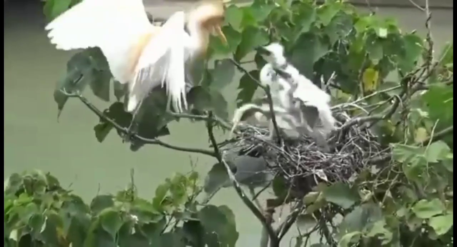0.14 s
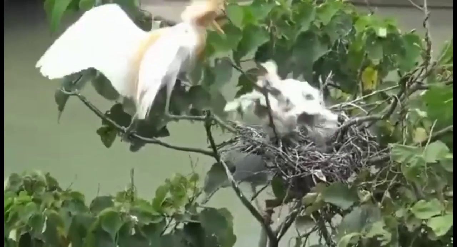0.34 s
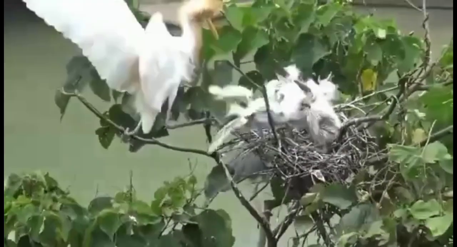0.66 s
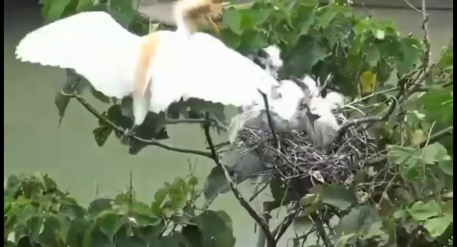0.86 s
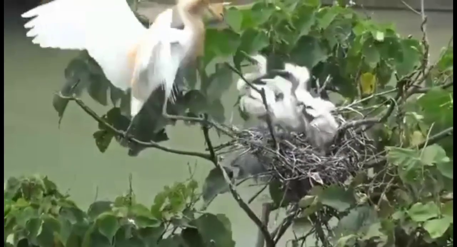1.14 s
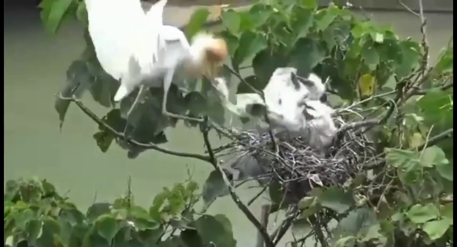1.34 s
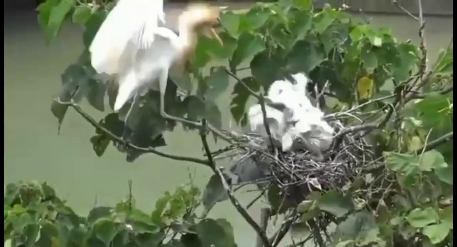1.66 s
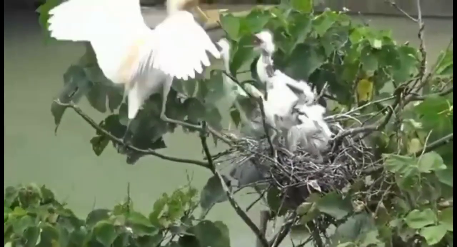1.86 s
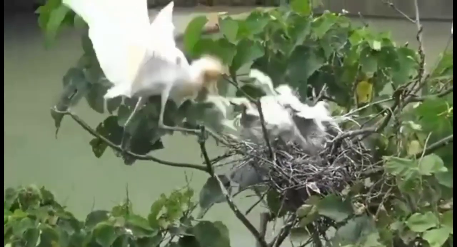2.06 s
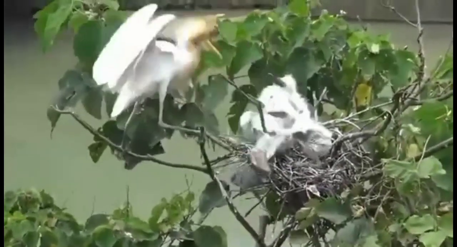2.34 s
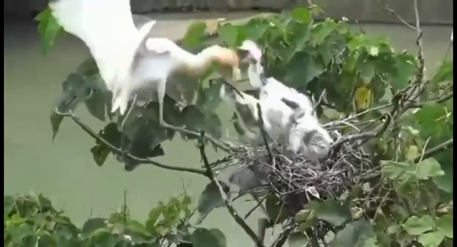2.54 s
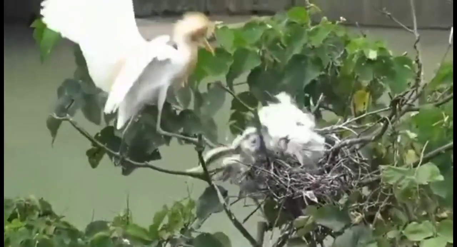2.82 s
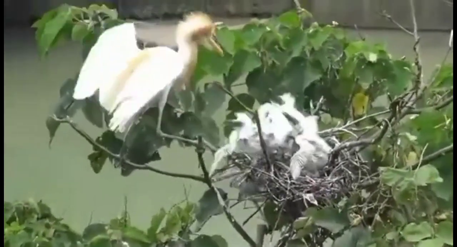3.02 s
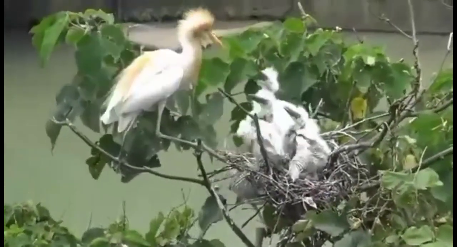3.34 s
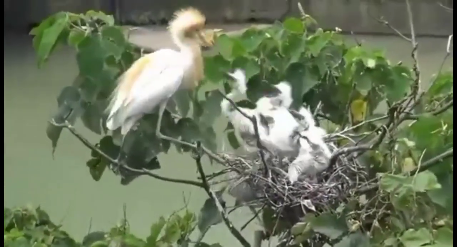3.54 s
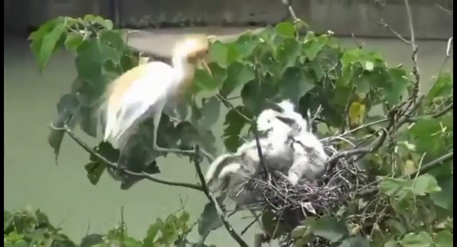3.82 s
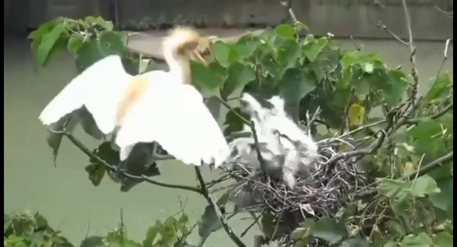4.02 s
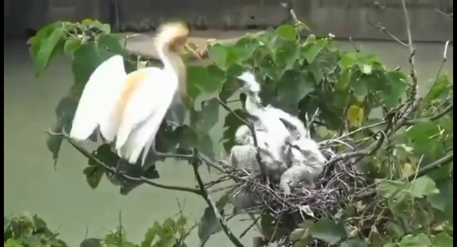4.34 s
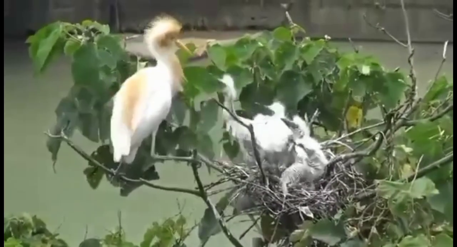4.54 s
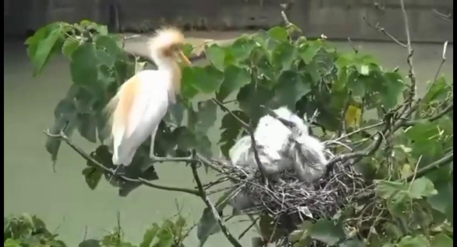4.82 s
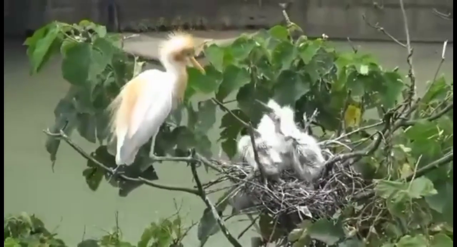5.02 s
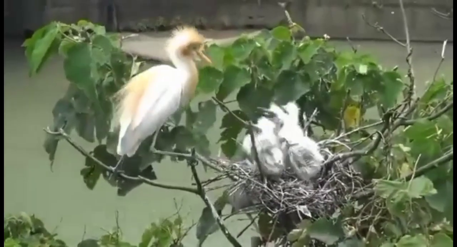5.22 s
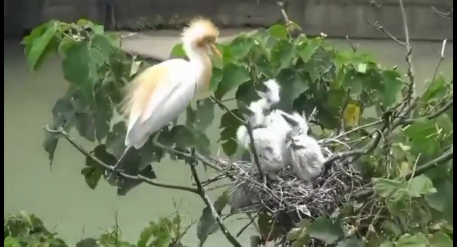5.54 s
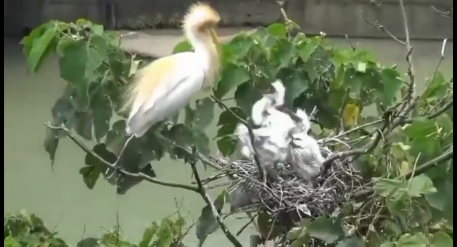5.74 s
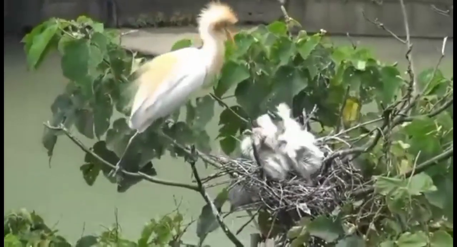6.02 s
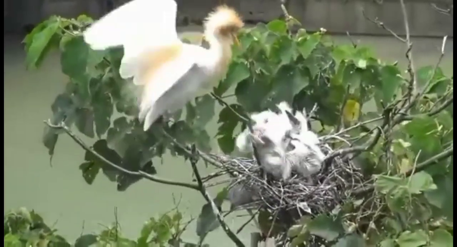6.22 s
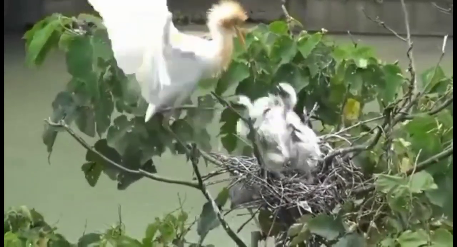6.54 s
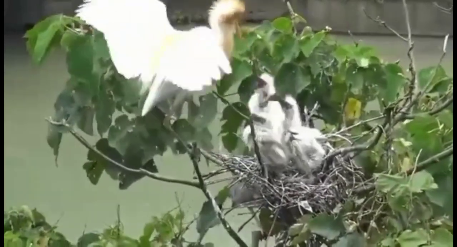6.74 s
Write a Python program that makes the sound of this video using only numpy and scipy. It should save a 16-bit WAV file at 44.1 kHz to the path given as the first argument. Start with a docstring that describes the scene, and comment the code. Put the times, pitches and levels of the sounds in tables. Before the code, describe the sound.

Several nestlings cheep frantically over one another, thin high whistled chirps sliding downward in an unbroken overlapping stream, close and outdoors.

```python
"""A brood of chicks begs from a nest in a leafy tree, over a quiet outdoor hush made of noise bands.
A loud falling peep opens the scene; more overlap in surges, mostly falling tones with two overtones.
Short low rasps of chopped noise slip in, with one dull knock near 2.9 s; fainter chicks peep behind.
The loudest peep comes about two and a half seconds in, and the begging goes on to the end.
Leaves and branches smear every call into a short haze of sparse, dying echoes."""
import sys
import numpy as np
from scipy import signal
from scipy.io import wavfile
from scipy.ndimage import uniform_filter1d

SR = 44100
rng = np.random.default_rng(int(sys.argv[2]) if len(sys.argv) > 2 else 0)


def master_out(mix):
    """Clip the mix to full scale and print it as 16-bit PCM to the path in sys.argv[1]."""
    frames = np.transpose(np.atleast_2d(mix))
    ceiling = np.clip(frames, -1, 1)
    pcm = np.round(ceiling * 32767).astype(np.int16)
    wavfile.write(sys.argv[1], SR, pcm)


N = 303408   # samples in the scene

# Hush: how strong each part of the range is against the rest (f/Hz, level per Hz/dB)
HUSH_SPECTRUM = [(30, -22.5), (90, -1), (150, -13.5), (260, -20.5), (700, -15.5), (1400, -13.5),
                 (6000, -21), (14000, -33.5)]
# How alike the hush is in the left and right ear (f/Hz, likeness/0-1)
HUSH_LIKENESS = [(60, 1), (300, .6), (1000, 0.73)]
# Short low sounds below the peeps: hoarse rasps, and one dull knock near 2.9 s
# (start t/s, length t/s, level/dB, centre f/Hz)
LOW_SOUNDS = [(0.046, 0.044, -67, 1870), (0.325, 0.17, -67.5, 2080), (0.756, 0.076, -60.5, 2180),
              (1.254, 0.046, -69.5, 1970), (1.415, 0.038, -72.5, 1640), (1.096, 0.066, -70, 2150),
              (1.634, 0.097, -71, 2130), (2.003, 0.062, -68, 2100), (2.928, 0.056, -75, 950),
              (3.96, 0.024, -71.5, 1740), (4.31, 0.081, -73, 1670), (5.008, 0.13, -65.5, 2000),
              (5.558, 0.038, -74, 1810), (6.06, 0.05, -68, 2090), (6.35, 0.062, -71, 2150)]
# Near peeps (start t/s, end t/s, loudest moment/share of length 0-1, start f/Hz, loudest f/Hz, end f/Hz,
# peak level before flutter/dB, left minus right level/dB, extra overtone level/dB)
PEEPS = [(0, 0.048, 0.87, 5190, 4165, 3860, -19.5, 7.5, -28),
         (0.039, 0.097, 0.88, 4950, 4490, 4600, -32, 10.5, -4),
         (0.011, 0.17, 0.68, 5390, 5180, 3760, -35, -1, -5),
         (0.132, 0.202, 0.49, 3960, 3260, 2945, -34, -2, 7),
         (0.283, 0.414, 0.76, 5570, 4860, 4440, -33, 4.5, 3),
         (0.366, 0.419, 0.69, 4780, 4210, 3550, -29.5, 5.5, -4),
         (0.351, 0.378, 0.38, 3900, 3380, 2760, -36, 9.5, -0.5),
         (0.425, 0.497, 0.49, 3940, 3124, 2925, -31, -4.5, 4.5),
         (0.466, 0.524, 0.64, 5280, 4750, 3940, -33, 0.5, 2),
         (.545, 0.588, 0.17, 5424, 5010, 4160, -23.5, 6.5, -21),
         (0.601, 0.715, 0.84, 5610, 4800, 4600, -33.5, 4.5, 6.5),
         (0.694, .762, 0.6, 4780, 3290, 2967, -30.5, 5, 3),
         (0.636, 0.656, 0.84, 3530, 3110, 2810, -34, 5, -3),
         (0.719, 0.817, 0.83, 5460, 3490, 3140, -35, 2, 1),
         (0.824, 0.922, 0.55, 5410, 4670, 3500, -27, -1, -4.5),
         (0.857, 0.949, 0.91, 6170, 5330, 5120, -37, 10, 4),
         (0.821, 0.86, 0.37, 4150, 3910, 3550, -33.5, 6.5, -10),
         (0.946, 0.988, 0.34, 5000, 4380, 3750, -23, 10, -1.5),
         (0.954, 1.029, 0.87, 6130, 5510, 4840, -31, 2.5, 9),
         (1.02, 1.057, 0.38, 4350, 4150, 3435, -26.5, 0.5, -4),
         (0.99, 1.036, 0.53, 3700, 3290, 3020, -28.5, -4, -5),
         (1.155, 1.178, 0.36, 3480, 3224, 3255, -34, -2.5, -14),
         (1.202, 1.276, 0.3, 5600, 6100, 5550, -43.5, 7.5, 8),
         (1.199, 1.244, 0.65, 5300, 5460, 5220, -38.5, -1.5, 10.5),
         (1.215, 1.285, 0.97, 6400, 6350, 6100, -36, 4, -2),
         (1.228, 1.329, 0.4, 5550, 4680, 3636, -22.5, -0.5, -2.5),
         (1.298, 1.344, 0.61, 3400, 3100, 2950, -26.5, 6.5, -3),
         (1.299, 1.351, 0.2, 5050, 4700, 3710, -19, 9, -14),
         (1.345, 1.431, 0.9, 6350, 5380, 5200, -30, 2.5, 0),
         (1.337, 1.406, 0.6, 5310, 4685, 3500, -31.5, 10.5, 6),
         (1.436, 1.461, 0.13, 3900, 3920, 3230, -26, 1, -10),
         (1.52, 1.578, 0.68, 5580, 4830, 4100, -31, -1, 11),
         (1.567, 1.647, 0.52, 5750, 4434, 3746, -21.5, 0.5, -11),
         (1.556, 1.592, 0.7, 3256, 3297, 3100, -24, 3.5, -3),
         (1.649, 1.702, 0.42, 5030, 4310, 3600, -21.5, 9.5, -13),
         (1.651, 1.672, 0.86, 6270, 6000, 6400, -28, 2.5, 2),
         (1.671, 1.74, 0.54, 5880, 5470, 4790, -26, 1.5, 2),
         (1.659, 1.688, 0.66, 3450, 3310, 2990, -30.5, 3, -16),
         (1.726, 1.756, 0, 4250, 4210, 3430, -21.5, 1, -26),
         (1.753, 1.828, 0.2, 5070, 4760, 3310, -34, 8.5, 4),
         (1.804, 1.909, 0.64, 5610, 4860, 3360, -33.5, 1, 8.5),
         (1.805, 1.854, 0.35, 4196, 3260, 3030, -30.5, 2.5, 3.5),
         (1.962, 2.051, 0.56, 5520, 4845, 3860, -26.5, .5, -26),
         (2.047, 2.093, 0.63, 3665, 3370, 2750, -30.5, 4.5, 5),
         (2.023, 2.093, 0.98, 6100, 5320, 6050, -40, 9.5, 16),
         (2.108, 2.149, 0.41, 5170, 4610, 3850, -20.5, 9.5, -1.5),
         (2.075, 2.137, 0.22, 4060, 3313, 3075, -29, 5.5, 1),
         (2.094, 2.145, 0.83, 6130, 5720, 5720, -26.5, 2.5, 6),
         (2.157, 2.189, 0.98, 5670, 5390, 5300, -33, 1.5, 11),
         (2.169, 2.187, 0.63, 3300, 3195, 2880, -29.5, 1.5, -13),
         (2.188, 2.22, 0.22, 4100, 4030, 3320, -26.5, 3, -10),
         (2.316, 2.366, 0.65, 4510, 3850, 2970, -35, 8, 0),
         (2.359, 2.426, 0.57, 4930, 3170, 2917, -33, -2.5, 0),
         (2.368, 2.479, 0.72, 5530, 4766, 3250, -33, 15.5, 5.5),
         (2.438, 2.538, 0.48, 5400, 5140, 4370, -33, -3, -3),
         (2.473, 2.512, 0.7, 5960, 5870, 5560, -32.5, 8, -2),
         (2.534, 2.592, 0.9, 5980, 5800, 5150, -39, 4, 4.5),
         (2.461, 2.479, 0.78, 3810, 3265, 3190, -33, 4, 0.5),
         (2.52, 2.587, 0.3, 5670, 4870, 3547, -16, 2, -33),
         (2.599, 2.649, 0.25, 4840, 4400, 3690, -19, 9, -21),
         (2.662, 2.679, 0.93, 3400, 3185, 2830, -25.5, 4.5, -1),
         (2.696, 2.806, 0.75, 5545, 4660, 3200, -30, 10, 7),
         (2.804, 2.903, 0.59, 4900, 4650, 4230, -32, -3, -4),
         (2.862, 2.922, 0.72, 6020, 5640, 4950, -24, 4, -3.5),
         (2.926, 2.959, 0.86, 3680, 3350, 2835, -29.5, 1.5, -9),
         (2.927, 2.983, 0.2, 4736, 4484, 3570, -17.5, 9.5, -16),
         (3.036, 3.146, 0.73, 5400, 4590, 4100, -27, 15, -0.5),
         (3.041, 3.065, 0.7, 3600, 3120, 3040, -33, 4.5, 9),
         (3.18, 3.212, 0.6, 4040, 3570, 3096, -25.5, 5, 1),
         (3.236, 3.332, 0.81, 6280, 5430, 4900, -37, 11, 4),
         (3.305, 3.354, 0.3, 4740, 4530, 3780, -17, 9, -16),
         (3.33, 3.374, 0.38, 3400, 3235, 2930, -37, 2.5, 10),
         (3.222, 3.306, 0.4, 6750, 6450, 5550, -45.5, 5.5, -10),
         (3.375, 3.402, 0.48, 3950, 3680, 3230, -24.5, 11.5, -3),
         (3.443, 3.514, 0.67, 5530, 4760, 3220, -33.5, 1.5, 4),
         (3.406, 3.491, 0.69, 5340, 4860, 3850, -34.5, 2, 17),
         (3.474, 3.506, 0.53, 3550, 3374, 2904, -32, 2.5, -4),
         (3.605, 3.71, 0.4, 4850, 4270, 3610, -34, 3.5, 6.5),
         (3.661, 3.697, 0.55, 3450, 3220, 2985, -30, 6.5, 3),
         (3.652, 3.695, 0.64, 6130, 6010, 5770, -27.5, 6, -2),
         (3.702, 3.792, 0.59, 5760, 4376, 3900, -18, 7, -12.5),
         (3.749, 3.815, 0.66, 5400, 4950, 3900, -22, 7, 2),
         (3.741, 3.791, 0.5, 3690, 3447, 3060, -24, 6.5, -5),
         (3.821, 3.855, 0.37, 4920, 4490, 3100, -43.5, 9.5, 19),
         (3.907, 3.975, 0.6, 4830, 4160, 3440, -29, 3, 3.5),
         (3.993, 4.036, 0.39, 3660, 3236, 2955, -35.5, 2, 10),
         (4.022, 4.125, 0.69, 5470, 4760, 3140, -32, 1, 7),
         (3.962, 4.083, 0.85, 5150, 4850, 3580, -37.5, 2, 4),
         (4.096, 4.197, 0.32, 5910, 5910, 5220, -32.5, 10, -1.5),
         (4.192, 4.232, 0.5, 4790, 4445, 4130, -21.5, 5, -17),
         (4.23, 4.263, .3, 4650, 4300, 3300, -26.5, 6.5, -11),
         (4.188, 4.213, 0.75, 3650, 3420, 2810, -29, 3, -9),
         (4.304, 4.346, 0.51, 3400, 3190, 2936, -34.5, 1.5, 7),
         (4.31, 4.385, 0.62, 4790, 4510, 4010, -25.5, 5, -6),
         (4.334, 4.446, 0.66, 5300, 4750, 3350, -31.5, 1.5, 5.5),
         (4.534, 4.614, 0.88, 6200, 5630, 5500, -40, 8, 11.5),
         (4.613, 4.655, 0.25, 4950, 4720, 3910, -23.5, 4.5, -13),
         (4.618, 4.675, 0, 4000, 3740, 2960, -30, 7, 5),
         (4.619, 4.709, 0.63, 5520, 4863, 3570, -30, 1, 4.5),
         (4.75, 4.86, 0.71, 5580, 4690, 3640, -29.5, -2.5, -7),
         (4.796, 4.858, 0.45, 4130, 3330, 2905, -33.5, 1, -50),
         (4.844, 4.922, 0.69, 5780, 5050, 4300, -37, 10, -5),
         (4.925, 5.008, 0.62, 4200, 3110, 2890, -36.5, 6, 5),
         (4.913, 4.943, 0.03, 4010, 3960, 3380, -29, 16.5, -6),
         (5.006, 5.099, 0.63, 5520, 4700, 3350, -30, 4, 7),
         (5.037, 5.109, 0.77, 5850, 5600, 4800, -34, 3.5, 4),
         (5.102, 5.136, 0.05, 4810, 4500, 4060, -21.5, 4, -10),
         (5.161, 5.272, 0.7, 4820, 3240, 3034, -27, 8.5, -6),
         (5.223, 5.268, 0.75, 4550, 4310, 4180, -29, 4, 1.5),
         (5.194, 5.333, 0.93, 5346, 4850, 4460, -39.5, 15.5, -26),
         (5.335, 5.416, 0.48, 4280, 3260, 3017, -30.5, 2, -9),
         (5.389, 5.491, 0.89, 6140, 5340, 5460, -38, 11.5, 5),
         (5.39, 5.47, 0.47, 6500, 6300, 5900, -38, 4.5, -12),
         (5.486, 5.533, 0.1, 4910, 4870, 3280, -24, 10, -3),
         (5.525, 5.594, 0.09, 5270, 4670, 3550, -24, -2, -6),
         (5.554, 5.6, 0.36, 4000, 3224, 3100, -28.5, 4.5, 0),
         (5.566, 5.642, 0.65, 4840, 4060, 3700, -39, 10.5, 12.5),
         (5.63, 5.77, 0.7, 4960, 5050, 4020, -48, 20.5, -8),
         (5.743, 5.827, 0.64, 5540, 4500, 2930, -34.5, 1.5, 7.5),
         (5.809, 5.889, 0.86, 5120, 4620, 3870, -36, 14.5, -0.5),
         (5.824, 5.866, 0.6, 4740, 3611, 3370, -34, 3.5, 1),
         (5.853, 5.89, 0.81, 3200, 3142, 3040, -28.5, 3, -2.5),
         (5.864, 5.935, 0.54, 5480, 5060, 4306, -26.5, -2, -19),
         (5.952, 5.986, 0.2, 4650, 4335, 3994, -26.5, -1, -9.5),
         (6.03, 6.105, 0.59, 4740, 4150, 3740, -35, 9.5, 4),
         (6.042, 6.143, 0.68, 5630, 4320, 3010, -30, 4.5, 4.5),
         (6.161, 6.205, 0.31, 3905, 3180, 3047, -23.5, 5.5, -1.5),
         (6.105, 6.214, 0.87, 5370, 4480, 3850, -36, 11, 6),
         (6.214, 6.335, 0.84, 4750, 4730, 3870, -33.5, 9, -27),
         (6.273, 6.387, 0.33, 5920, 5580, 3950, -34.5, 6, -15),
         (6.326, 6.423, 0.74, 5326, 4660, 3750, -25, -2.5, -22),
         (6.383, 6.435, 0.64, 3640, 3204, 3084, -31, -1, -9.5),
         (6.431, 6.514, 0.42, 5070, 4850, 3540, -26, 7.5, 0.5),
         (6.494, 6.565, 0.5, 5110, 4870, 2920, -36.5, 11, 4),
         (6.472, 6.542, 0.34, 4030, 3307, 2807, -30, 6, 11.5),
         (6.586, 6.727, 0.8, 5026, 4700, 3490, -39, 17.5, -14),
         (6.75, 6.816, 0.28, 4070, 3525, 2910, -29.5, 8.5, 0),
         (6.74, 6.849, 1, 5010, 4390, 4100, -29.5, 8, -6),
         (6.717, 6.873, 0.6, 5900, 5400, 3250, -29, 6, -1.5),
         (6.823, 6.899, 0.79, 5450, 4636, 4700, -18.5, -1.5, -11)]
# Throat and beak: strength of each overtone by where it falls, before a peep's own extra
# (overtone f/Hz, level against the whistle/dB)
SECOND_PARTIAL = [(6300, -8), (7200, -25), (8300, -26.5), (9800, -21), (11000, -25.5), (12500, -35.5)]
THIRD_PARTIAL = [(9500, -31), (13000, -46)]

HUSH_DB, HUSH_SWAY_DB = -73, 1.5   # overall level; typical swelling and sinking of each band

# leaf echoes: a fast and a slow dying part, each with its time to fall 60 dB and its strength
LEAVES_T60_S, LEAVES_DB = 0.17, -6.5
LATE_T60_S, LATE_DB = 0.87, -22
LEAF_ECHOES_PER_S = 900   # separate echoes at first; they grow denser with delay
ECHO_CROSSING = 0.13   # share of each side's sound that the far side's leaves return
ECHO_PAN_DB = -4.0   # left minus right: denser leaves on the right

PULSE_HZ, LOW_WIDTH_HZ = 152.5, 720   # middle pulse rate, which wanders; width of the resonance

# fainter chicks: middle values that chance spreads out
FAINT_TOP_HZ, FAINT_END_HZ = 5560, 3240
FAINT_DB, FAINT_SPREAD_DB = -46.5, 3.5
FAINT_SHORT_S, FAINT_EXTRA_S = 0.061 * 0.65, 0.061   # least length, and most that chance adds
FAINT_DELAY_S = .04   # latest start after the near peep's start
FAINT_PEAK_AT, FAINT_SLIDE_SHARE = 0.73, 0.38   # loudest moment, and how much of the fall is done by then
FAINT_FOLLOWS = 0.83   # dB of change for each dB of a near peep, which stirs the chicks behind

# most peeps slide down while they swell, a few rise slightly first; then the slope changes and they fade
ONSET_S, SWELL_DB, SWELL_CURVE = .016, 11.5, 1.26
FADE_DB, FADE_CURVE = 10.5, 3.22
SLIDE_CURVE, DROP_CURVE = 1.1, 1.2   # above 1 the pitch lingers before it moves on
LEAD_IN_SHARE = 0.034   # slope before the start, as a share of the downward slide that follows
# then the pitch plunges as the breath runs out
DIVE_S, DIVE_SPEEDUP = 0.02, 2.47
DIVE_LEAST, DIVE_MOST = 30500, 31300   # Hz per s
# a peep that is loudest early snaps in
SNAP_BELOW, SNAP_S, SNAP_SWELL_DB = .31, .002, 4.0
# a high one that is loudest last hangs, then breaks sharply downward
BREAK_ABOVE, BREAK_FROM_HZ, HANG_CURVE = .88, 5600, 3.7
BREAK_HZ_PER_S, BREAK_S = 170000, 0.017

FLUTTER_DB, WOBBLE = 1.8, .005   # typical swing of level; of pitch, as a share
HOARSE_DB, RASP_DB = -25, -11   # breath noise: the overtones are hoarser than the whistle
PATCH_DB = 2.87   # typical swing of the overtones, which come in patches
OVERTONE_FADE_DB = 13   # the overtones give out first after the loudest moment
LAG_S_PER_DB = 1.6e-5   # a chick louder on the left also arrives there first
VOICE_FLOOR_HZ = 2220   # tiny throats radiate little below this

SQUARE_LAW = 0.006   # microphone bends peaks slightly
CUTOFF_HZ = 13150


def from_db(db):
    """Turn decibels into a plain multiplier."""
    return 10 ** (np.asarray(db) / 20)


def rms_one(x):
    """Scale a signal to an average strength (rms) of 1."""
    return x / np.sqrt(np.mean(x ** 2) + 1e-20)


def at_hz(points, hz):
    """Read a table between its rows, along a log frequency scale."""
    table = np.array(points)
    return np.interp(np.log(hz), np.log(table[:, 0]), table[:, 1])


def drift(rate_hz, count):
    """Slow chance of spread 1: noise through a double one-pole low-pass."""
    r = np.exp(-2 * np.pi * rate_hz / SR)
    noise = rng.standard_normal((count, N + 4000))
    slow = signal.lfilter([1], [1, -2 * r, r * r], noise)[:, 4000:]   # skip the filter's settling
    return rms_one(slow)


def band_noise(top_hz, count):
    """Noise with a steep upper edge; spread 1."""
    low_pass = signal.butter(4, top_hz, fs=SR, output="sos")
    return rms_one(signal.sosfilt(low_pass, rng.standard_normal((count, N))))


def hush():
    """Far rumble and rustle: half-octave noise bands, partly shared by both ears."""
    out, edges = 0, 20 * 2 ** np.arange(0, 9.6, .5)
    white, sway = rng.standard_normal((2, 2, N)), drift(5, count=3)
    for k, (low, high) in enumerate(zip(edges, edges[1:])):
        band = signal.butter(2, [low, high], "band", fs=SR, output="sos")
        mid, side = signal.sosfilt(band, white[k % 2])
        centre = np.sqrt(low * high)
        alike = np.clip(at_hz(HUSH_LIKENESS, centre), 0, 1)
        both_ears = np.sqrt(1 + alike) * mid + np.sqrt(1 - alike) * side * [[1], [-1]]
        level_db = at_hz(HUSH_SPECTRUM, centre) + HUSH_SWAY_DB * sway[k % len(sway)]
        out = out + from_db(level_db) * both_ears
    return from_db(HUSH_DB) * rms_one(out)


def foliage(x):
    """Countless leaf echoes: a fast and a slow dying noise, unrelated in the two ears."""
    s = np.arange(SR) / SR
    swell = np.clip(s / 0.0037, 0, 1) ** 2   # the echoes build up over the first few milliseconds
    shape = 0
    for t60, db in ((LEAVES_T60_S, LEAVES_DB), (LATE_T60_S, LATE_DB)):
        tail = swell * from_db(-60 * s / t60)
        shape = shape + from_db(db) * tail / np.sqrt(np.sum(tail ** 2))
    first_chance = LEAF_ECHOES_PER_S / SR   # chance of an echo at each sample
    hits = rng.random((2, SR)) < first_chance * (1 + (s / .03) ** 2)
    sparse = hits * rng.standard_normal((2, SR))
    # divide by the crowding, so that denser echoes are not louder
    echoes = shape * sparse / np.sqrt(np.minimum(first_chance * (1 + (s / 0.032) ** 2), 1))
    crossed = (1 - ECHO_CROSSING) * x + ECHO_CROSSING * x[::-1]
    haze = signal.fftconvolve(crossed, echoes, axes=1)[:, :N]
    return from_db(ECHO_PAN_DB * np.array([[.5], [-.5]])) * haze


def low_sounds():
    """Rasps and one dull knock: noise chopped by uneven pulses, in a broad resonance."""
    out, noise = np.zeros(N), rng.standard_normal(N)
    pulse_hz = PULSE_HZ * from_db(2.9 * drift(28.67, count=1)[0])
    chop = np.maximum(np.sin(2 * np.pi * np.cumsum(pulse_hz) / SR), .15)   # never quite shuts
    for start, length, level_db, hz in LOW_SOUNDS:
        i = np.arange(int(start * SR), min(int((start + length) * SR), N))
        edges = [hz - LOW_WIDTH_HZ / 2, hz + LOW_WIDTH_HZ / 2]
        resonance = signal.butter(2, edges, "band", fs=SR, output="sos")
        burst = signal.sosfilt(resonance, noise[i] * chop[i]) * np.hanning(len(i))
        out[i] += from_db(level_db) * rms_one(burst)
    return out


def faint_chicks():
    """Rows for chicks further back, three to each near peep: a slow slide that steepens at the end."""
    near = np.repeat(np.array(PEEPS), 3, axis=0)
    u = rng.random((len(near), 6))
    start = near[:, 0] + FAINT_DELAY_S * u[:, 0]
    top = FAINT_TOP_HZ * (1 + 0.18 * (u[:, 1] - .5))
    end = FAINT_END_HZ * (1 + .3 * (u[:, 2] - .5))
    loudest = top + FAINT_SLIDE_SHARE * (end - top)
    near_db = near[:, 6]
    level_db = FAINT_DB + FAINT_FOLLOWS * (near_db - near_db.mean()) + FAINT_SPREAD_DB * (u[:, 3] - .5)
    length = FAINT_SHORT_S + FAINT_EXTRA_S * u[:, 4]
    pan_db, same = 14 * u[:, 5] - 8, np.ones(len(u))
    return np.column_stack([start, start + length, FAINT_PEAK_AT * same, top, loudest, end,
                            level_db, pan_db, -14.0 * same])


def peeps(rows):
    """Each peep is a fluttering near-sine with two weak overtones; most fall, a few rise slightly first."""
    out = np.zeros((2, N))
    flutter, wobble, breath = drift(87, count=4), drift(78, count=4), band_noise(990, count=4)
    for k, (start, end, peak_at, top_hz, peak_hz, end_hz, peak_db, pan_db, bright_db) in enumerate(rows):
        first = max(int((start - ONSET_S) * SR) - 20, 0)
        i = np.arange(first, min(int((end + DIVE_S) * SR) + 20, N))
        s, length, lane = i / SR - start, end - start, k % 4   # four lanes of chance, used in turn
        swell_s = length * np.clip(peak_at, .05, .95)
        fade_s, end_hz = length - swell_s, min(end_hz, peak_hz)
        swelling = np.clip(s / swell_s, 0, 1)
        fading = np.clip((s - swell_s) / fade_s, 0, 1)

        # how this peep starts and ends
        snaps = peak_at < SNAP_BELOW
        breaks = peak_at > BREAK_ABOVE and top_hz > BREAK_FROM_HZ
        onset_s, swell_db = (SNAP_S, SNAP_SWELL_DB) if snaps else (ONSET_S, SWELL_DB)
        if breaks:
            fall, dive_s, slide = -BREAK_HZ_PER_S, BREAK_S, HANG_CURVE
        else:
            fall = np.clip((end_hz - peak_hz) / fade_s * DIVE_SPEEDUP, -DIVE_MOST, -DIVE_LEAST)
            dive_s, slide = DIVE_S, SLIDE_CURVE

        # pitch: gentle lead-in, slide, drop, final plunge, with rounded corners
        lead_in = max(top_hz - peak_hz, 0) / swell_s * LEAD_IN_SHARE
        pitch = np.where(s < swell_s, top_hz + (peak_hz - top_hz) * swelling ** slide,
                         peak_hz + (end_hz - peak_hz) * fading ** DROP_CURVE)
        pitch = pitch + fall * np.maximum(s - length, 0) - lead_in * np.minimum(s, 0)
        pitch = uniform_filter1d(pitch, size=200, mode="nearest") * (1 + WOBBLE * wobble[lane, i])

        # loudness: a breaking peep does not fade before it breaks
        level_db = peak_db - swell_db * np.clip(1 - s / swell_s, 0, 1) ** SWELL_CURVE
        if not breaks:
            level_db = level_db - FADE_DB * fading ** FADE_CURVE
        edge = np.clip(np.minimum(1 + s / onset_s, 1 + (length - s) / dive_s), 0, 1)
        height = from_db(level_db + FLUTTER_DB * flutter[lane, i]) * np.sin(np.pi / 2 * edge) ** 2

        # hoarse overtones
        rasp = (1 + from_db(RASP_DB) * breath[lane - 1, i]) * from_db(PATCH_DB * flutter[lane - 1, i])
        rasp = rasp * from_db(-OVERTONE_FADE_DB * np.clip((s - swell_s) / (fade_s + dive_s), 0, 1))
        second = rasp * from_db(at_hz(SECOND_PARTIAL, 2 * pitch) + bright_db)
        third = rasp * from_db(at_hz(THIRD_PARTIAL, 3 * pitch) + bright_db)
        air = 1 + from_db(HOARSE_DB) * breath[lane, i]   # air noise roughens the whistle

        for ear, sign in enumerate((1, -1)):   # left, right
            lead_s = sign * LAG_S_PER_DB * pan_db / 2
            turn = 2 * np.pi * (np.cumsum(pitch) / SR + pitch * lead_s)
            tone = air * np.sin(turn) + second * np.sin(2 * turn) + third * np.sin(3 * turn)
            out[ear, i] += np.sqrt(2) * from_db(sign * pan_db / 2) * height * tone
    return out


def scene():
    """The hush, the brood, the low sounds, and the echoes in the tree."""
    throat = signal.butter(6, VOICE_FLOOR_HZ, "high", fs=SR, output="sos")
    near = signal.sosfilt(throat, peeps(PEEPS) + 1e-18)
    far = signal.sosfilt(throat, peeps(faint_chicks()) + 1e-18)
    near_tree = near + far + low_sounds()
    return hush() + foliage(near_tree) + near_tree


def record(dry):
    """A slightly uneven diaphragm adds faint sum and difference tones; the top is cut."""
    high_pass = signal.butter(2, 250, "high", fs=SR, output="sos")
    bent = signal.sosfilt(high_pass, dry ** 2)
    top_cut = signal.ellip(10, .5, 60, CUTOFF_HZ, fs=SR, output="sos")
    return signal.sosfilt(top_cut, dry + SQUARE_LAW * bent)


dry = scene()
out = record(dry)
master_out(out)
```